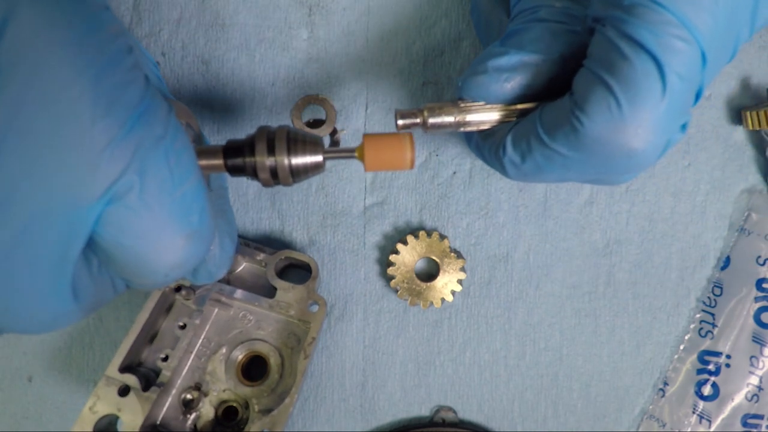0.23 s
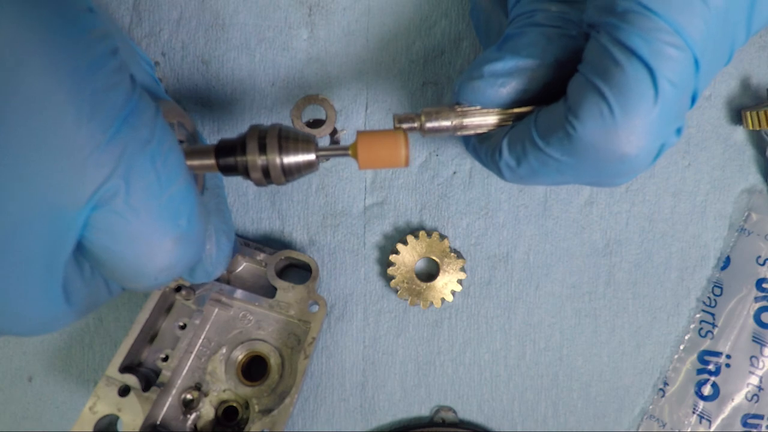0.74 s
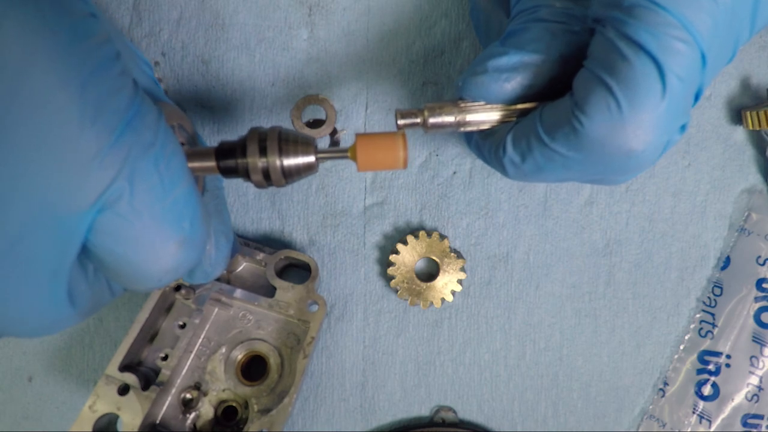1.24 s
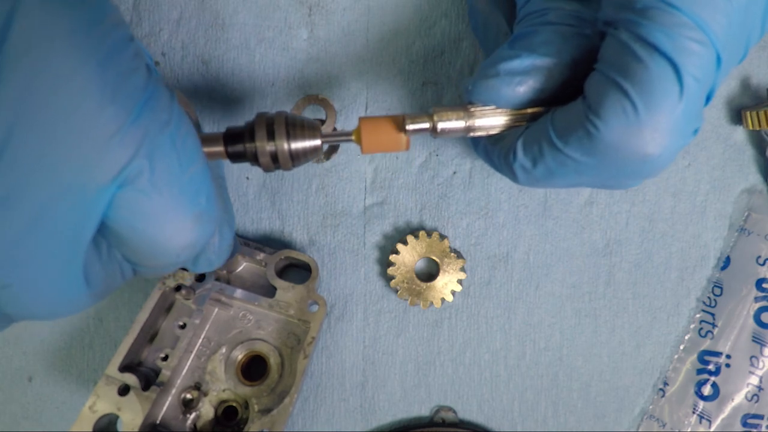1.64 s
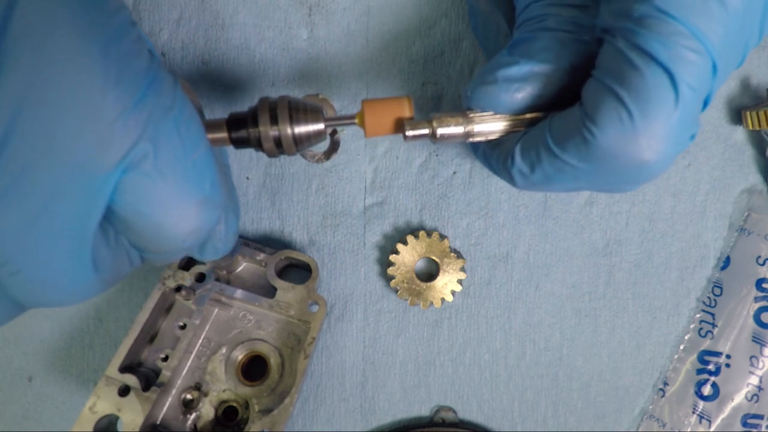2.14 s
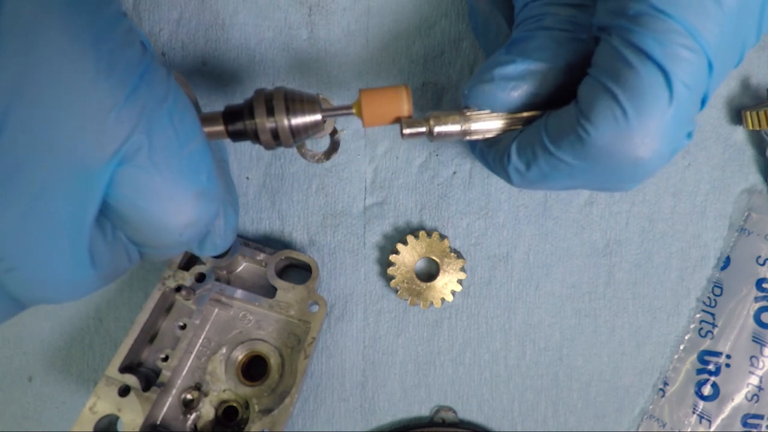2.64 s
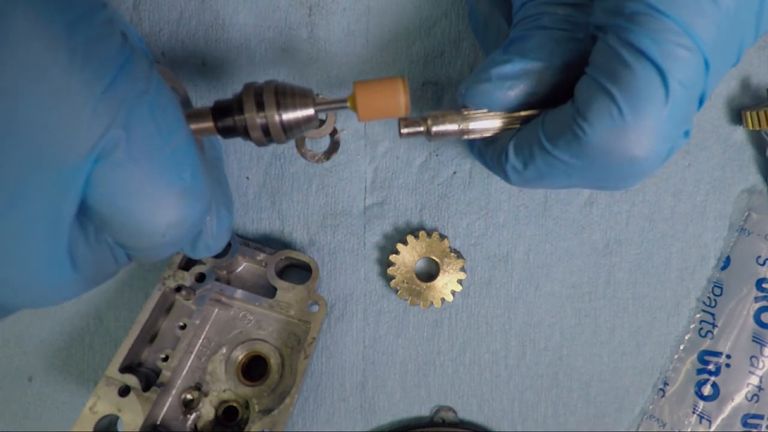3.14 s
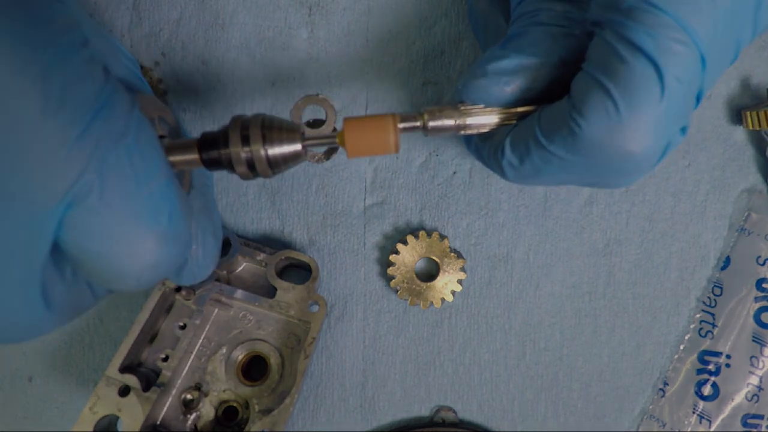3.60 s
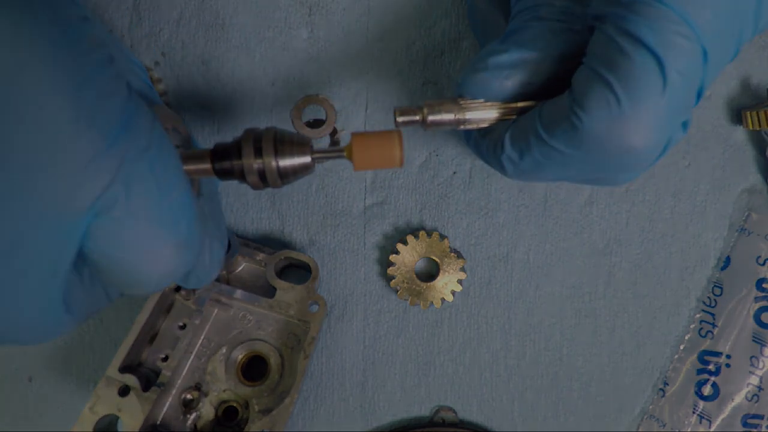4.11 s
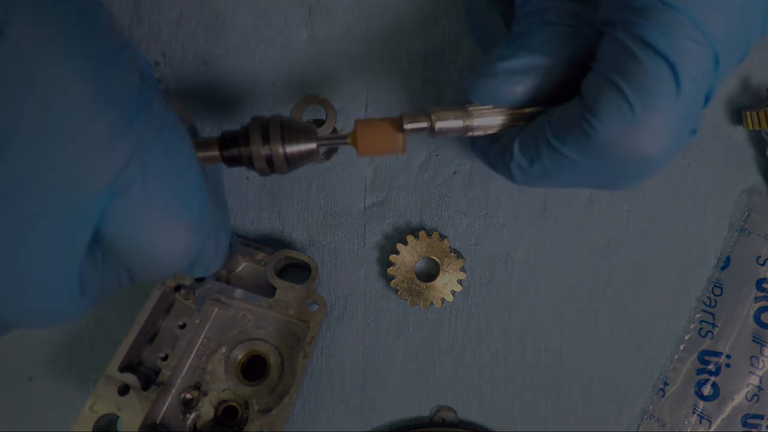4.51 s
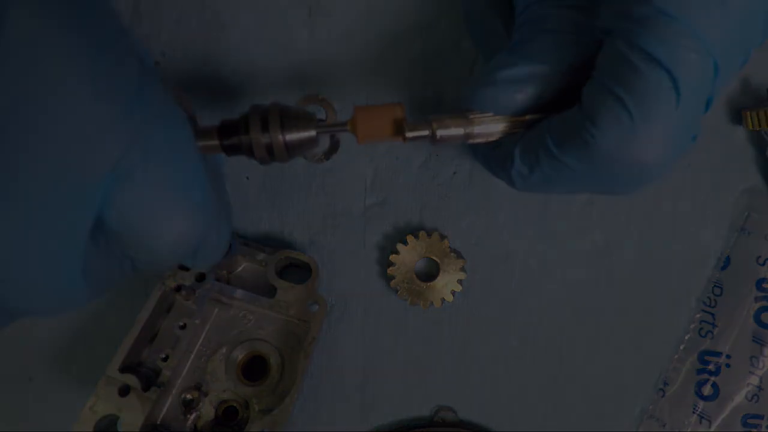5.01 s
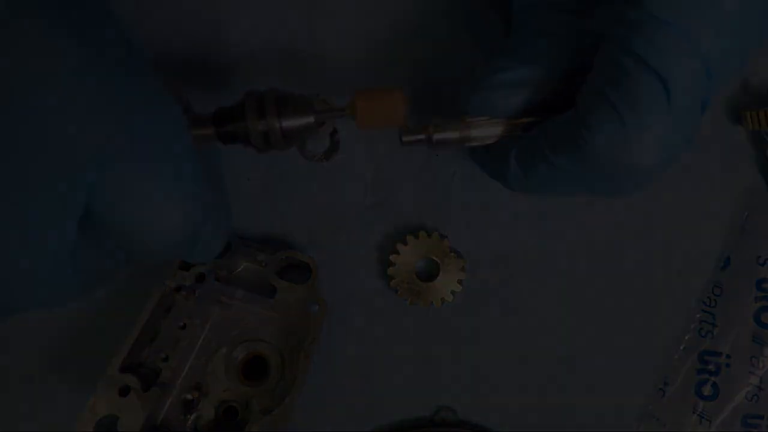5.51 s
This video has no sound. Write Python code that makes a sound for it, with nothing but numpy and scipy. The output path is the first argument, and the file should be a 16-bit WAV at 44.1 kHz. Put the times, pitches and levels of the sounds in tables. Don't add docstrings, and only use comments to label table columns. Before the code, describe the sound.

Rough, bright buzzing of a small spinning sanding drum on metal, with changing pressure, ringing tones, late chattering bounces and a gradual fade.

```python
import sys
import numpy as np
from scipy import signal
from scipy.fft import rfft, irfft
from scipy.io import wavfile
from scipy.ndimage import uniform_filter1d

SR = 44100
rng = np.random.default_rng(int(sys.argv[2]) if len(sys.argv) > 2 else 0)


def put_to_file(sound):
    columns = np.atleast_2d(sound).T
    safe = np.clip(columns, -1, 1)
    whole_steps = np.round(safe * 32767)
    wavfile.write(sys.argv[1], SR, whole_steps.astype(np.int16))


def magnitude_from_level(level_db):
    exponent = np.asarray(level_db, float) / 20
    return 10 ** exponent


N = 253575
FREE_SPEED_HZ = 209.9
FIRM_DB = -26.5


# [pitch_hz, width_hz, level_db]
BODY_RINGS = [(1077, 81, -1.5), (1504, 170, 1.5), (2033, 370, 1), (2768, 55, 9), (588, 197, -9.5)]
# [pitch_hz, level_db]
SHAFT_COLOUR = [(2500, -18.5), (3100, 2.5), (3700, 0.5), (4500, -3), (5100, -6), (5500, -5.5), (5900, -17),
                (6600, -29)]
# [pitch_hz, level_db]
GRIT_COLOUR = [(3410, -37), (5800, -42), (6070, -2.5), (6830, -1.5), (8640, -6), (9670, -1), (14000, -4),
               (15300, -10), (15800, -49.5)]


def grinding(turns):
    body_db, shaft_db, centre_hz = hand()
    hiss_db = -7 + 0.58 * shaft_db + 0.098 * (body_db - FIRM_DB)
    force = scratch(turns, fresh=0.35, spread_db=2.1, high_spot_db=3.0)
    body = rms_one(rings(force, BODY_RINGS))
    shaft = colour(force, SHAFT_COLOUR)
    shaft = rms_one(shaft + 3.1 * moving_ring(shaft, centre_hz, width_hz=1070))
    grit = scratch(turns, fresh=0.5, spread_db=3.0, high_spot_db=3.3)
    hiss = rms_one(colour(grit, GRIT_COLOUR))
    pressure = magnitude_from_level(body_db + 0.9 * drift(31))
    solid = skipping() * (magnitude_from_level(-5.5) * body + magnitude_from_level(shaft_db - 3.5) * shaft)
    return pressure * (solid + magnitude_from_level(hiss_db - 0.5) * hiss) + magnitude_from_level(body_db) * ringing(turns)


# [start_s, body_level_db, shaft_above_body_db, shaft_pitch_hz]
PRESSURE = [(0, -48, 0.5, 4600), (0.27, -43, -1.5, 4530), (0.284, -29, -1, 4400), (0.6, -26.5, -3, 4300),
            (1.14, -28, 0, 4320), (1.5, -29, -1, 4430), (1.56, -33.5, -1.5, 5000), (1.8, -32, -3.5, 4530),
            (2.35, -36.5, 4.5, 4400), (2.58, -29, -1, 4240), (3.2, -28, 0, 4960), (3.51, -30, 2.5, 4970),
            (3.545, -40.5, -14, 4500), (3.87, -51.5, 3, 4500), (3.93, -30.5, -0.5, 4230),
            (4.51, -23.5, 1.5, 5030), (4.58, -28.5, -3, 4570), (5.75, -28, 0.5, 4430)]
# [middle_s, length_s, level_db]
NUDGES = [(1.745, .005, 3.5), (2.19, 0.0041, 2.5), (2.382, 0.005, 4.5), (2.42, 0.0048, 5), (4.084, .008, 5),
          (.225, .008, 5), (1.307, .01, 1.5), (3.171, 0.011, 1.5), (4.32, 0.0091, 2), (4.532, 0.007, 1.5),
          (2.077, .008, 2.5), (3.664, .006, 2.5), (0.088, 0.0033, 10.5), (1.007, 0.019, 2),
          (3.895, .006, 9.5), (4.845, 0.044, 0.5), (5.664, 0.017, 0.5), (0.118, 0.025, 19),
          (0.193, 0.015, 16), (0.282, 0.016, 4.5), (0.385, 0.0043, -2), (0.728, 0.015, 3),
          (0.918, 0.021, -2.5), (1.274, 0.0069, -6), (1.393, 0.022, 3), (1.61, 0.012, -16),
          (1.72, 0.0039, -14), (2.173, 0.058, 3), (2.35, 0.02, -4), (2.89, 0.0071, 2.5),
          (4.354, 0.034, -1.5), (3.498, 0.016, 4), (3.651, 0.026, 11.5), (3.716, 0.013, 15),
          (5.385, 0.022, 2.5), (4.177, 0.076, -2.5), (4.76, 0.0064, 2), (4.986, 0.036, -7.5),
          (5.208, 0.2, -4.5), (5.445, 0.0075, -5), (5.47, 0.012, 4), (5.707, 0.015, -4.5)]


def hand():
    steady_db, shaft_db, centre_hz = in_time(PRESSURE)
    return steady_db + sum_of_swells(NUDGES), shaft_db, centre_hz


def scratch(turns, fresh, spread_db, high_spot_db):
    grains = round(SR / FREE_SPEED_HZ)
    keep = np.exp(-1 / 12.0)
    new = rng.standard_normal((int(turns[-1]) + 60, grains))
    new = new * magnitude_from_level(spread_db * rng.exponential(1, grains))
    pattern = signal.lfilter([1], [1, -keep], new, axis=0)[50:]
    own_tones = [1, 2, 3] + list(CHATTER_ORDERS) + list(SINGING_ORDERS) + list(BUZZ_ORDERS)
    orders = rfft(pattern, axis=1)
    orders[:, own_tones] = 0
    pattern = irfft(orders, grains, axis=1).ravel()
    lasting = rms_one(pattern[(turns * grains).astype(int)])
    grain_db = spread_db * np.minimum(rng.exponential(1, N), 5)
    broken = rms_one(rng.standard_normal(N) * magnitude_from_level(grain_db))
    angle = 2 * np.pi * turns + 1.72 * drift(2.47)
    bite_db = high_spot_db * (1 + 0.04 * drift(27.0)) * (np.cos(angle) + 1.43 * np.cos(2 * angle))
    return rms_one(magnitude_from_level(bite_db) * (np.sqrt(1 - fresh) * lasting + np.sqrt(fresh) * broken))


CHATTER_ORDERS = (5, 6, 7, 8, 9, 10, 13)
CHATTER_QUIET_DB = [-19, -32, -21, -16.5, -15.5, -27, -16.5]
# [middle_s, length_s, pitch_hz, level_db]
CHATTER = [(.81, 0.079, 1050, -13), (2.46, 0.12, 2729, -5.5), (2.76, 0.14, 1050.0, -16.5),
           (3.374, 0.08, 1050.0, -13), (4.22, 0.1, 1050.0, -16), (3.12, 0.03, 1259.0, -9.5),
           (3.295, 0.035, 1259.0, -14), (3.495, 0.023, 1259.0, -15), (4.394, 0.055, 1259.0, -12),
           (4.35, 0.05, 2729, -14), (0.742, 0.12, 1469.0, -19.0), (1.27, 0.12, 1469.0, -21),
           (2.95, 0.035, 2099, -16), (3.415, 0.066, 1469.0, -21), (3.09, 0.037, 2099, -13),
           (4.37, 0.03, 2099, -16), (0.755, 0.105, 1679.0, -19), (1.09, 0.073, 1679.0, -21),
           (1.35, 0.082, 1679.0, -23), (3.095, 0.025, 1679.0, -17.0), (3.51, 0.04, 1679.0, -17.0),
           (4.23, 0.037, 1679.0, -17.0), (4.37, 0.022, 1679.0, -15.0), (0.155, 0.097, 1889.0, -11),
           (0.315, 0.05, 1889.0, -10), (0.493, 0.06, 1889.0, -12), (1.155, 0.023, 1889.0, -19),
           (1.49, 0.035, 1889.0, -14.0), (2.46, 0.055, 1889.0, -11), (2.765, 0.025, 1889.0, -15),
           (3.02, 0.029, 1889.0, -10), (3.505, 0.032, 1889.0, -11), (4.125, 0.055, 1889.0, -19),
           (4.36, 0.031, 1889.0, -9.5), (0.145, 0.14, 2099.0, -5.5), (0.46, 0.24, 2099.0, -10.5),
           (0.945, 0.035, 2099.0, -10), (1.525, 0.088, 2099.0, -14), (1.92, 0.065, 2099.0, -8),
           (3.285, 0.023, 2099.0, -8), (3.47, 0.048, 2099.0, -7), (4.11, 0.04, 2099.0, -14),
           (4.577, 0.025, 2099.0, -8), (4.836, 0.031, 2099.0, -9), (0.72, 0.044, 2729, -9),
           (1.8, 0.05, 2729, -10), (1.93, 0.082, 2729, -13), (2.17, 0.14, 2729, -4.5),
           (4.86, 0.067, 2729, -6.5), (5.11, 0.094, 2729, -2)]
BUZZ_ORDERS = (11, 12, 14, 15, 16, 18, 19)
BUZZ_QUIET_DB = [-18.5, -20.5, -20, -20, -16.5, -17, -36]
# [middle_s, length_s, pitch_hz, level_db]
BUZZ = [(0.35, 0.07, 2309.0, -25), (0.55, 0.1, 2309.0, -16), (0.728, 0.027, 2309.0, -16),
        (0.96, 0.077, 2309.0, -21), (2.21, 0.48, 2309.0, -14), (2.815, 0.1, 2309.0, -32),
        (3.3, 0.033, 2309.0, -26), (3.46, 0.05, 2309.0, -11), (0.22, 0.04, 2519.0, -19),
        (0.783, 0.04, 2519, -17), (0.6, 0.06, 2519.0, -13), (2.325, 0.045, 2519.0, -10),
        (2.728, 0.05, 2519.0, -8), (3.68, 0.086, 2519.0, -10), (4.135, 0.069, 2519.0, -23),
        (0.557, 0.025, 2939.0, -30), (0.688, 0.055, 2939.0, -27), (0.96, 0.041, 2939.0, -16),
        (1.335, 0.035, 2939.0, -17), (2.25, 0.063, 2939.0, -7), (3.105, 0.11, 2939.0, -19),
        (3.5, 0.03, 2939.0, -23), (3.98, 0.055, 2939.0, -17), (4.275, 0.11, 2939.0, -23),
        (0.695, 0.05, 3148.0, -16), (0.895, 0.1, 3148.0, -13), (1.212, 0.025, 3148.0, -19.0),
        (1.906, 0.09, 3148.0, -24), (2.102, 0.04, 3148.0, -8), (2.24, 0.055, 3148.0, -16),
        (2.467, 0.074, 3148.0, -12), (2.757, 0.17, 3148.0, -13.5), (3.075, 0.025, 3148.0, -21),
        (4.44, 0.071, 3148.0, -14), (0.56, 0.028, 3358.0, -21.0), (2.735, 0.057, 3358.0, -19.0),
        (3.127, 0.088, 3358.0, -17), (4.22, 0.034, 3358.0, -18), (4.855, 0.065, 3358.0, -13),
        (2.265, 0.075, 3778.0, -11), (4.24, 0.09, 3778.0, -24), (4.65, 0.023, 3778.0, -26),
        (4.808, 0.07, 3778.0, -19), (5.386, 0.032, 3778.0, -12), (0.455, 0.055, 3988.0, -25),
        (2.52, 0.07, 3988.0, -18), (2.77, 0.11, 3988.0, -26.0), (3.155, 0.15, 3988.0, -9),
        (5.41, 0.16, 3988.0, -23)]
SINGING_ORDERS = (17, 20, 21, 22, 23, 24, 25, 26)
SINGING_QUIET_DB = [-16, -15, -14, -14, -20.5, -19, -25, -25]
# [middle_s, length_s, pitch_hz, level_db]
SINGING = [(0.67, 0.1, 3568.0, -13), (1.232, 0.027, 3568.0, -14), (2.185, 0.19, 3568.0, -12),
           (2.455, 0.105, 3568.0, -15.0), (2.83, 0.15, 3568.0, -12), (5.455, 0.11, 3568.0, -10),
           (0.4, 0.086, 4198.0, -12), (1.37, 0.063, 4198.0, -11), (2.778, 0.15, 4198.0, -19),
           (2.97, 0.023, 4198.0, -20), (3.146, 0.13, 4198.0, -13), (.77, 0.12, 4408, -16),
           (4.23, 0.1, 4198.0, -16), (4.455, 0.069, 4198.0, -12), (5.42, 0.056, 4198, -11),
           (5.6, 0.22, 4198.0, -15), (2.7, 0.06, 4618, -18), (1.325, 0.025, 4408.0, -5),
           (2.134, 0.078, 4408.0, -10), (2.28, 0.03, 4408.0, -15), (2.76, 0.17, 4408.0, -7),
           (3.143, 0.1, 4408.0, -9), (5.478, 0.14, 4408.0, -10), (0.322, 0.025, 4618.0, -12),
           (0.767, 0.091, 4618.0, -10), (1.2, 0.15, 4618.0, -18), (1.437, 0.047, 4618.0, -9),
           (3.02, 0.15, 4618.0, -9), (3.46, 0.03, 4618.0, -7), (4.007, 0.035, 4618.0, -13),
           (4.2, 0.023, 4618.0, -16.0), (4.463, 0.065, 4618.0, -10), (5.42, 0.08, 4618, -12),
           (1.54, 0.039, 4828.0, -11), (2.725, 0.075, 4828.0, -16), (3.48, 0.042, 4828.0, -15),
           (4.375, 0.11, 4828.0, -12), (5.44, 0.09, 4828.0, -19), (0.814, 0.07, 5038.0, -17),
           (1.155, 0.11, 5038.0, -20), (1.5, 0.11, 5038.0, -18), (3.24, 0.2, 5038.0, -7),
           (4.415, 0.14, 5038.0, -9), (2.74, 0.084, 5248.0, -13), (3.095, 0.17, 5248.0, -21),
           (4.38, 0.08, 5248.0, -20), (2.74, 0.12, 5457.0, -17), (3.17, 0.11, 5457.0, -17),
           (3.495, 0.045, 5457.0, -22), (4.364, 0.087, 5457.0, -15)]
# [middle_s, length_s, pitch_hz, level_db]
REAR_BEARING = [
    (0.116, 0.025, 2143, -9),
    (0.204, 0.02, 2143, -3),
    (.46, 0.055, 2143, -22),
    (1.805, 0.1, 2143, -20),
    (2.21, 0.21, 2143, -8),
    (2.54, 0.055, 2143, -12),
    (3.945, 0.044, 2143, -4.5),
    (4.63, 0.034, 2143, -13),
    (4.825, 0.12, 2143, -13),
]


def ringing(turns):
    chatter_db = caught(CHATTER_ORDERS, CHATTER_QUIET_DB, CHATTER)
    chatter = tones(turns, CHATTER_ORDERS, chatter_db, waver_db=1.5, loose=1.0)
    buzz_db = caught(BUZZ_ORDERS, BUZZ_QUIET_DB, BUZZ)
    buzz = tones(turns, BUZZ_ORDERS, buzz_db, waver_db=1.5, loose=0.8)
    singing_db = caught(SINGING_ORDERS, SINGING_QUIET_DB, SINGING)
    singing = tones(turns, SINGING_ORDERS, singing_db, waver_db=1.5, loose=0.9)
    rear_order = [10.21]
    rear_db = caught(rear_order, [-34], REAR_BEARING)
    rear = tones(turns, rear_order, rear_db, waver_db=0.5, loose=0.9)
    rasp = magnitude_from_level(1.5 * drift(90))
    return rasp * skipping() * (chatter + buzz + singing) + rear


def caught(orders, quiet_db, catches):
    t = np.arange(0, N, 50) / SR
    pitches_hz = np.array(orders) * FREE_SPEED_HZ
    gains = [np.full(len(t), magnitude_from_level(db)) for db in quiet_db]
    for middle_s, length_s, hz, db in catches:
        nearest = np.argmin(np.abs(pitches_hz - hz))
        gains[nearest] += magnitude_from_level(db) * np.exp(-0.5 * np.abs((t - middle_s) / length_s) ** 5)
    return [np.interp(np.arange(N) / SR, t, 20 * np.log10(gain)) for gain in gains]


# [middle_s, length_s, depth_db]
SKIPS = [
    (4.46, .05, 2),
    (4.8, .12, 4),
    (5.08, .07, 5),
]


def skipping():
    depth_db = sum_of_swells(SKIPS)
    surge_dies_s = 0.0049
    landed = (knocks() > 0) + 1e-18
    surge = signal.lfilter([1], [1, -np.exp(-1 / (surge_dies_s * SR))], landed)
    return magnitude_from_level(depth_db * (1.6 * surge - 0.73))


def landings():
    clicks = knocks() + 1e-18
    return magnitude_from_level(15.5) * colour(clicks, SHAFT_COLOUR) + magnitude_from_level(14.0) * rings(clicks, BODY_RINGS)


# [start_s, peak_level_db]
BOUNCES = [(4.4077, -30), (4.4221, -25), (4.4367, -24), (4.4512, -25), (4.4605, -22), (4.4703, -16),
           (4.4842, -14), (4.4993, -26), (4.5146, -24), (4.6058, -26), (4.6202, -26), (4.6295, -27),
           (4.639, -23), (4.6491, -29), (4.658, -20), (4.668, -31), (4.6776, -32), (4.6924, -21),
           (4.7162, -33), (4.7306, -23), (4.7401, -21), (4.7544, -17), (4.7688, -24), (4.793, -24),
           (4.8074, -20), (4.822, -19), (4.8315, -35), (4.8406, -26), (4.855, -21), (4.8647, -31),
           (4.8787, -20), (4.894, -16.5), (4.9084, -20), (4.9221, -24), (4.9413, -20), (5.023, -23),
           (5.0367, -16.5), (5.051, -20), (5.0654, -20), (5.0801, -26), (5.0942, -35), (5.1085, -28),
           (5.1233, -18), (5.1395, -21), (5.1563, -21), (5.1754, -23), (5.1898, -22)]


def knocks():
    start_s, level_db = np.transpose(BOUNCES)
    clicks = np.zeros(N)
    clicks[(start_s * SR).astype(int)] = magnitude_from_level(level_db)
    return clicks


SHAKE_DB = [-49, -56, -40.5]
SHAKE_FOLLOWS = [0.85, 0.38, 1.11]
# [start_s, length_s, loss_db]
EDGE_RIDES = [
    (0.91, 0.027, 24),
    (1.41, 0.46, 27),
    (2.275, 0.12, 10),
    (3.25, 0.47, 6),
    (4.444, 0.74, 8.5),
]
EDGE_SHARE = [-0.41, 0.072, -1.25]
# [middle_s, length_s, level_db]
TWO_LOBES = [
    (0.153, 0.11, 8),
    (1.02, 0.16, 6),
    (1.456, 0.055, 7),
    (3.404, 0.09, 11),
    (4.014, 0.12, 8.5),
    (4.496, 0.1, 12),
]


def shake(turns):
    t = np.arange(N) / SR
    loss_db = sum(db * ((t > start_s) & (t < start_s + length_s)) for start_s, length_s, db in EDGE_RIDES)
    loss_db = uniform_filter1d(loss_db.astype(float), int(0.07 * SR))
    effort_db = np.maximum(hand()[0] - FIRM_DB, -14)
    levels = [db + follows * effort_db + share * loss_db
              for db, follows, share in zip(SHAKE_DB, SHAKE_FOLLOWS, EDGE_SHARE)]
    levels[1] = levels[1] + sum_of_swells(TWO_LOBES)
    return tones(turns, (1, 2, 3), levels, waver_db=2.0, loose=0.84)


# [middle_s, length_s, level_db]
HOWLS = [
    (0.615, 0.092, -44),
    (1.06, 0.051, -40.5),
    (2.925, 0.045, -38.5),
    (3.206, 0.036, -36.5),
    (3.386, 0.029, -48),
    (.73, 0.03, -41),
    (4.49, 0.033, -36),
]


def howl(turns):
    level = sum(magnitude_from_level(row[2]) * hump for row, hump in zip(HOWLS, swells(HOWLS)))
    return level * tones(turns, [5.58], [0], waver_db=5.0, loose=0.51)


WHINE_ORDERS = [4.58, 5, 5.58, 7.58, 9.58, 20, 10.21, 48, 12, 13, 18, 23, 24, 35, 36, 37, 46, 47]
WHINE_DB = [-54, -53, -46.5, -49.5, -55, -59.5, -44, -63, -48.5, -52.5, -50.5, -54, -58, -61, -55, -60, -70,
            -61]
# [pitch_hz, level_db]
AIR_COLOUR = [(18, -45), (30, -12), (238, -20.5), (362, -14.5), (1010, -1.5), (1420, -5), (1570, -5),
              (1840, -6.5), (2100, -2.5), (3360, -8.5), (3740, -7.5), (4980, -12), (5680, -16),
              (10500, -14.5), (15800, -23)]


def motor(turns):
    whine = tones(turns, WHINE_ORDERS, WHINE_DB, waver_db=3.0, loose=1.0)
    air = rms_one(colour(rng.standard_normal(N), AIR_COLOUR))
    return whine + magnitude_from_level(-35.5) * air


HUM_DB = [-55, -59, -61.5, -55, -67]


def hum():
    t = np.arange(N) / SR
    total = np.zeros(N)
    for multiple, db in enumerate(HUM_DB, start=1):
        total += magnitude_from_level(db + 2.5) * np.sin(2 * np.pi * 60 * multiple * t + rng.uniform(0, 9.4))
    return total


def tones(turns, orders, levels, waver_db, loose):
    total = np.zeros(N)
    for order, db in zip(orders, levels):
        loudness = magnitude_from_level(db + 2.5 + waver_db * drift(21.0))
        total += loudness * np.sin(2 * np.pi * order * turns + loose * drift(6.2))
    return total


def swells(rows):
    t = np.arange(N) / SR
    coarse = t[::40]
    return [np.interp(t, coarse, np.exp(-0.5 * ((coarse - row[0]) / row[1]) ** 2)) for row in rows]


def sum_of_swells(rows):
    return sum(row[2] * hump for row, hump in zip(rows, swells(rows)))


def rms_one(x):
    return x / np.sqrt(np.mean(x ** 2) + 1e-20)


def in_time(rows):
    start_s, *columns = np.transpose(rows)
    return [np.interp(np.arange(N) / SR, start_s, column) for column in columns]


def drift(rate_hz):
    r = np.exp(-80 * np.pi * rate_hz / SR)
    noise = rng.standard_normal(N // 40 + 2002)
    slow = rms_one(signal.lfilter([1], [1, -2 * r, r * r], noise)[2000:])
    return np.interp(np.arange(N) / 40, np.arange(len(slow)), slow)


def colour(x, points):
    hz = np.fft.rfftfreq(N, 1 / SR) + 1
    table = np.array(points)
    gain_db = np.interp(np.log(hz), np.log(table[:, 0]), table[:, 1])
    return irfft(rfft(x) * magnitude_from_level(gain_db), N)


def resonance(hz, width_hz):
    r = np.exp(-np.pi * width_hz / SR)
    return (1 - r * r) / 2 * np.array([1, 0, -1]), [1, -2 * r * np.cos(2 * np.pi * hz / SR), r * r]


def rings(x, modes):
    total = np.zeros(N)
    for k, (hz, width_hz, db) in enumerate(modes):
        total += (-1) ** k * magnitude_from_level(db) * signal.lfilter(*resonance(hz, width_hz), x)
    return total


def moving_ring(x, centre_hz, width_hz, size=256):
    out, state = np.zeros(N), np.zeros(2)
    for i in range(0, N, size):
        b, a = resonance(centre_hz[i], width_hz)
        out[i:i + size], state = signal.lfilter(b, a, x[i:i + size], zi=state)
    return out


# [start_s, turns_per_s]
SPEED = [(0.0, 209.6), (0.34, 208.9), (0.72, 207.3), (0.82, 207.3), (0.94, 208.0), (1.4, 207.9),
         (1.9, 209.1), (2.46, 209.1), (2.86, 208.0), (2.98, 207.1), (3.48, 207.2), (3.58, 208.8),
         (3.82, 210.1), (4.2, 208.8), (4.44, 206.9), (4.66, 208.7), (5.1, 209.4), (5.62, 207.3)]


def spindle():
    turns = np.cumsum(in_time(SPEED)[0]) / SR
    return np.maximum(turns + 0.006 * drift(15), 0)


def scene():
    turns = spindle()
    fade_start_s, fade_end_s = 3.39, 6.355
    fade = np.clip((fade_end_s - np.arange(N) / SR) / (fade_end_s - fade_start_s), 0, 1)
    tool = fade * (grinding(turns) + shake(turns))
    background = fade * (motor(turns) + hum())
    mid = tool + landings() + howl(turns) + background
    return np.array([mid, mid])


def top_cut(x):
    return signal.sosfilt(signal.butter(12, 16280, fs=SR, output="sos"), x)


# [pitch_hz, level_below_middle_db]
SIDE_COLOUR = [(30, -14), (110, -15), (200, -22), (380, -15), (700, -14), (1290, -21), (2380, -24),
               (4400, -22), (8120, -16), (15000, -16)]


def record(dry):
    mid = signal.sosfilt(signal.ellip(10, 0.5, 50, 15680, fs=SR, output="sos"), dry[0])
    smear = rng.standard_normal(3000) * magnitude_from_level(-60 * np.arange(3000) / SR / 0.11)
    smeared = signal.fftconvolve(mid, smear / np.linalg.norm(smear))[:N]
    bursts = magnitude_from_level(2.5) * np.clip(5 * (drift(8) - 0.2), 0, 1)
    side = bursts * colour(smeared, SIDE_COLOUR)
    return top_cut(np.array([mid + side, mid - side]))


dry = scene()
out = record(dry)
put_to_file(out)
```